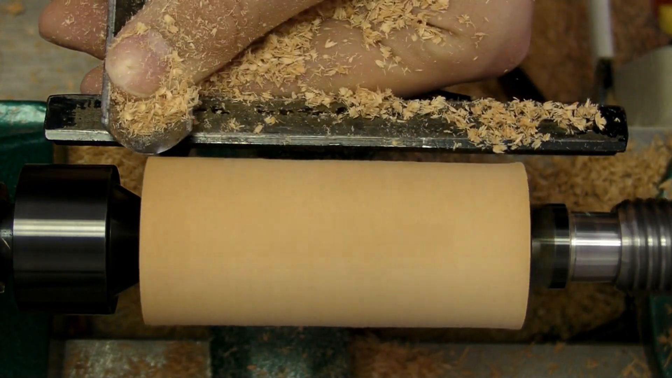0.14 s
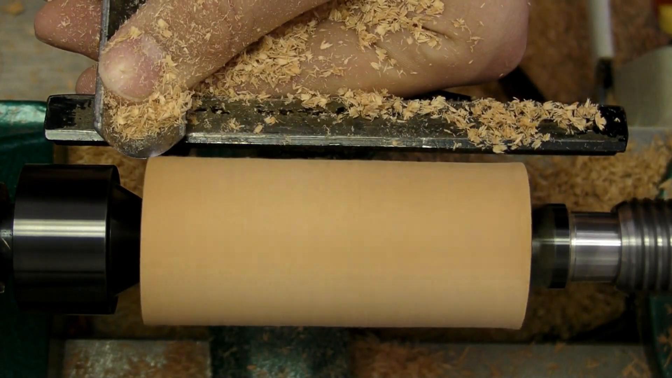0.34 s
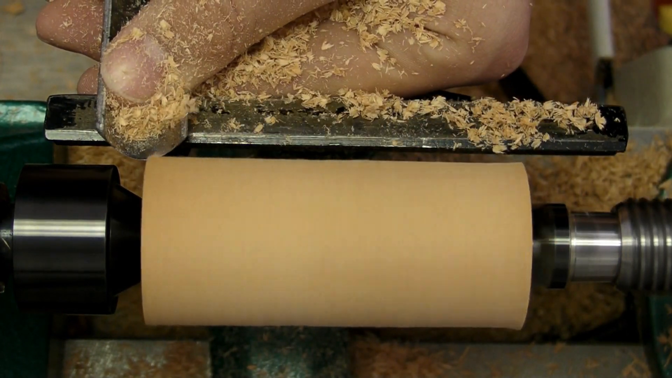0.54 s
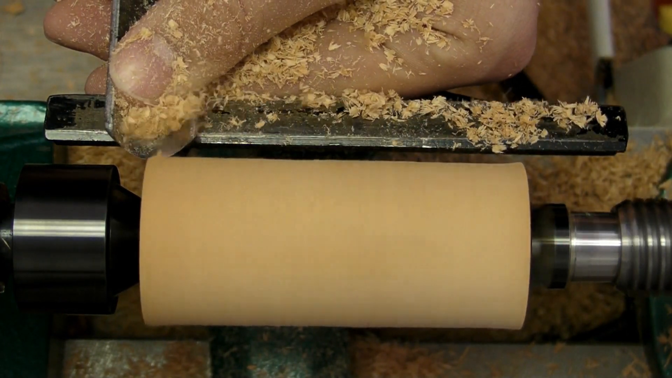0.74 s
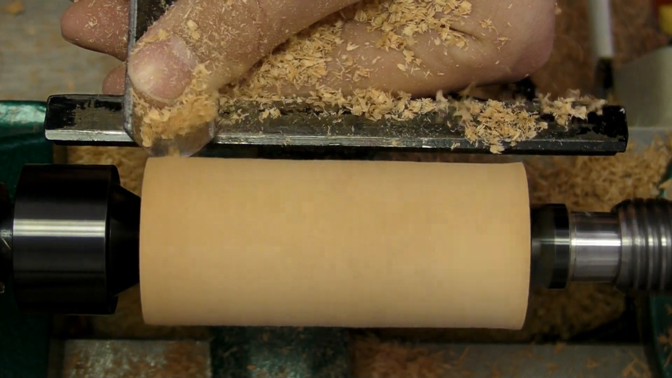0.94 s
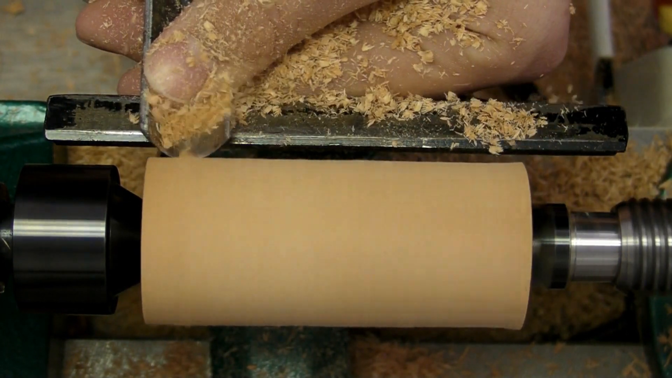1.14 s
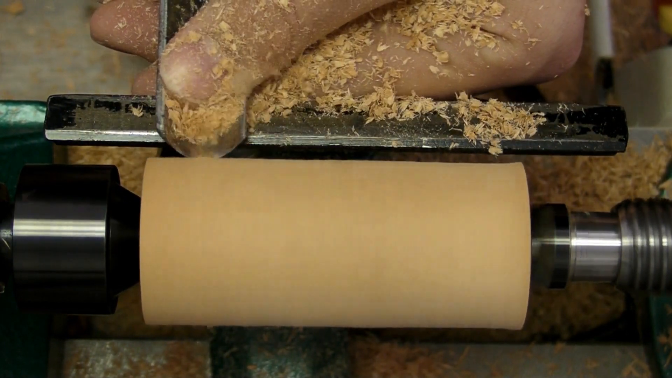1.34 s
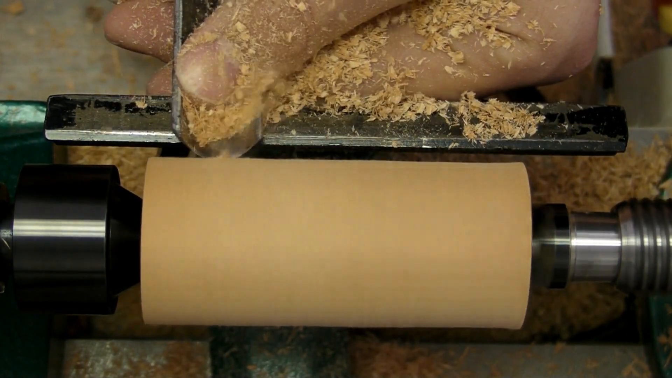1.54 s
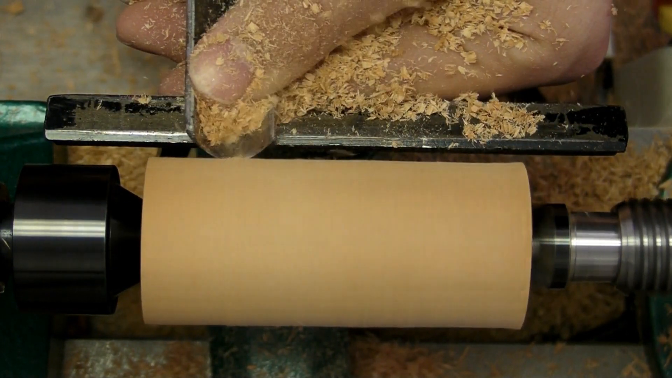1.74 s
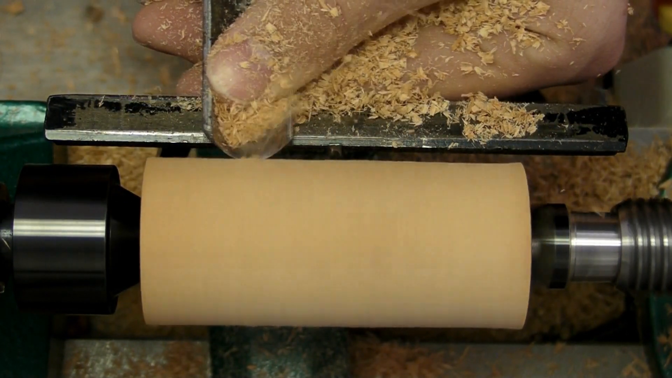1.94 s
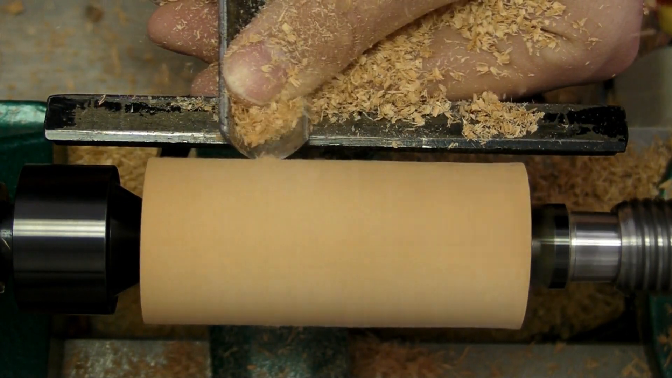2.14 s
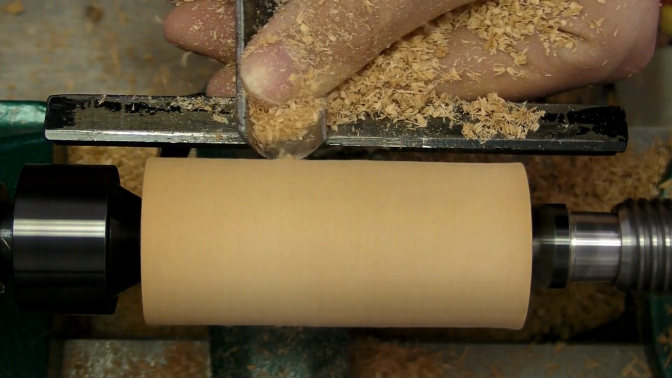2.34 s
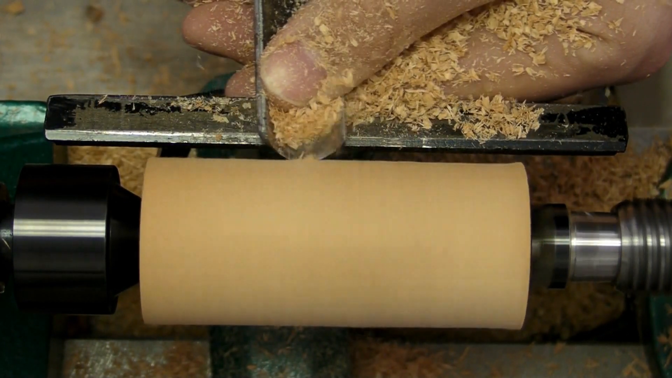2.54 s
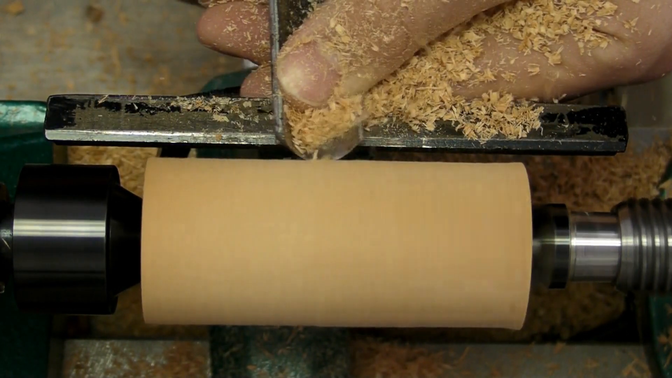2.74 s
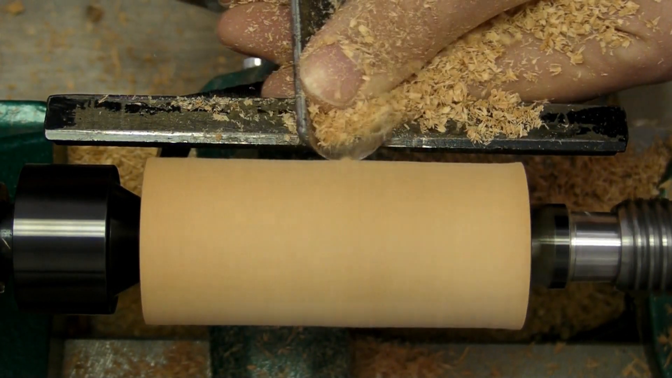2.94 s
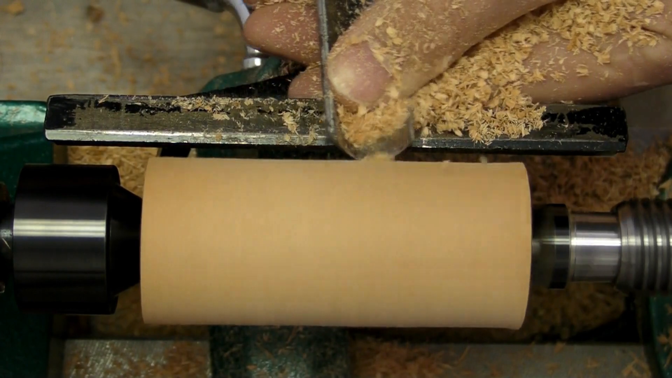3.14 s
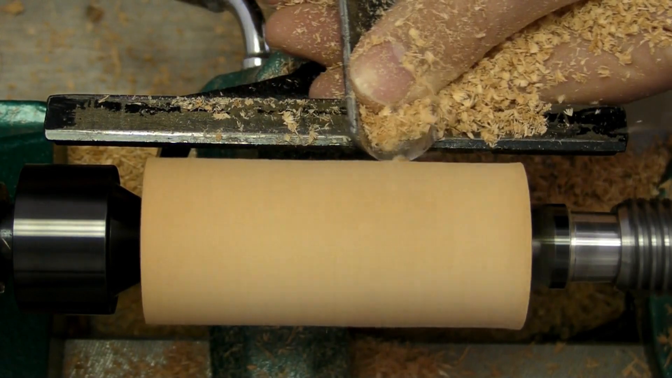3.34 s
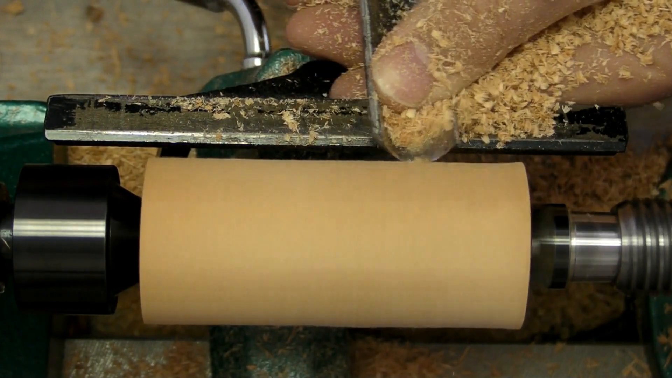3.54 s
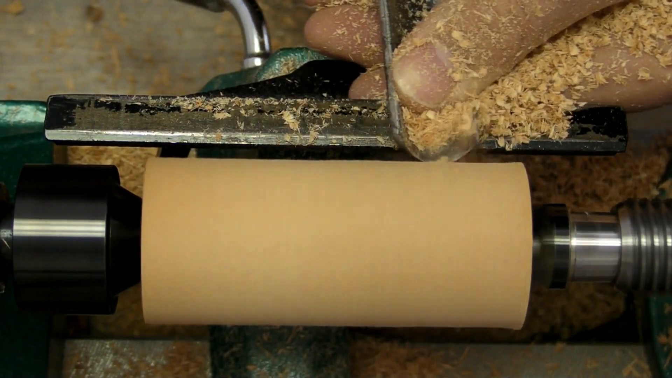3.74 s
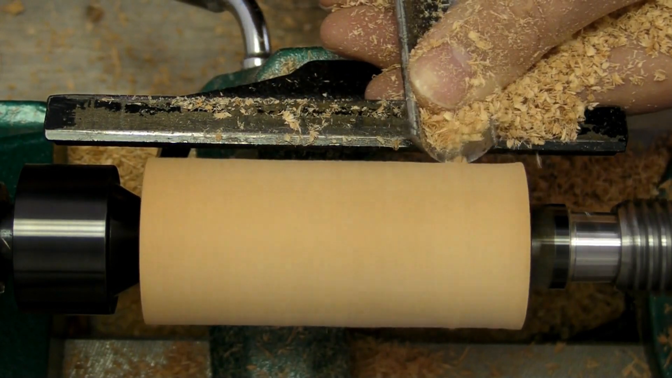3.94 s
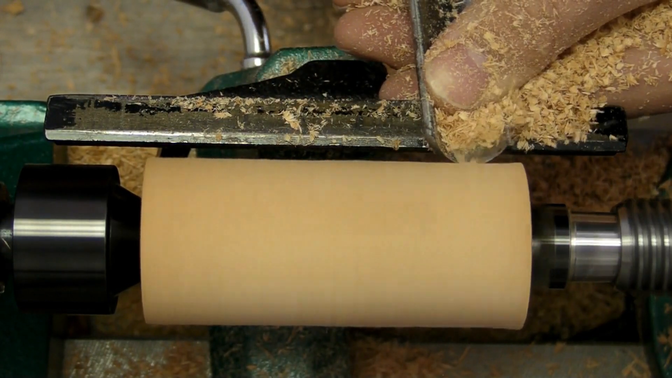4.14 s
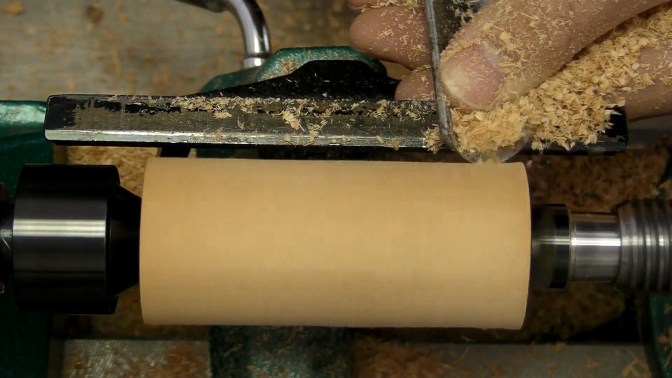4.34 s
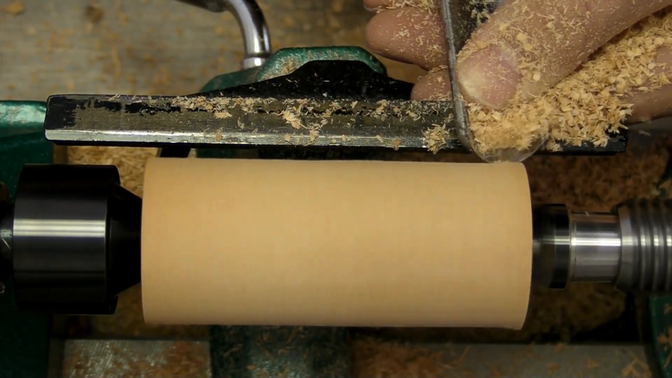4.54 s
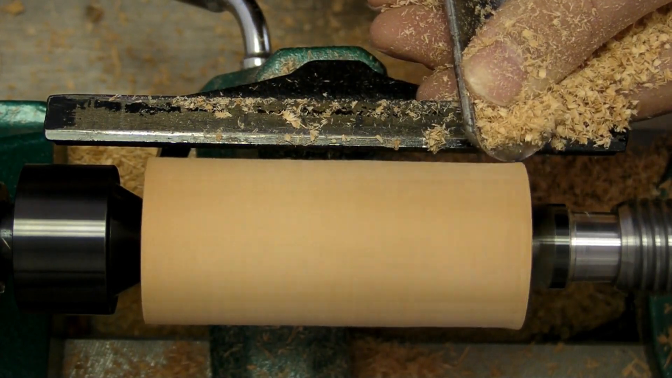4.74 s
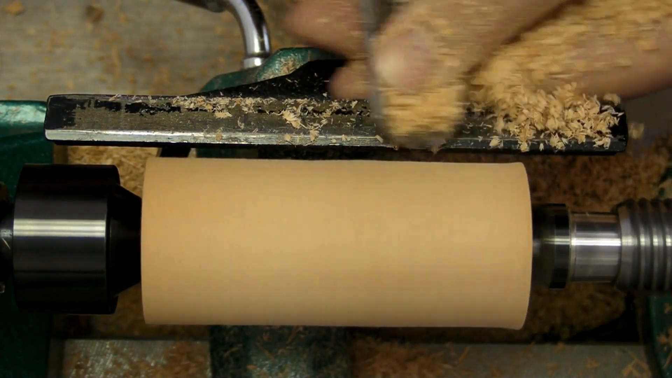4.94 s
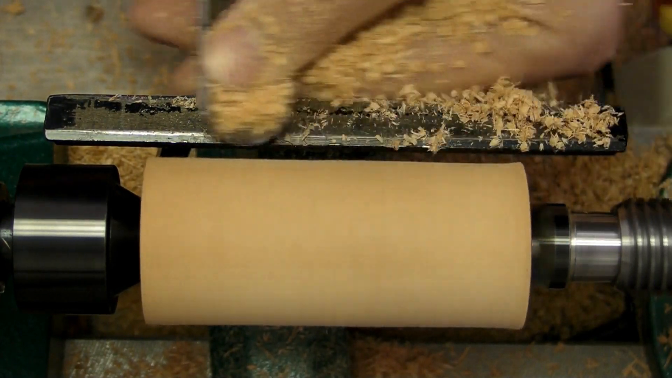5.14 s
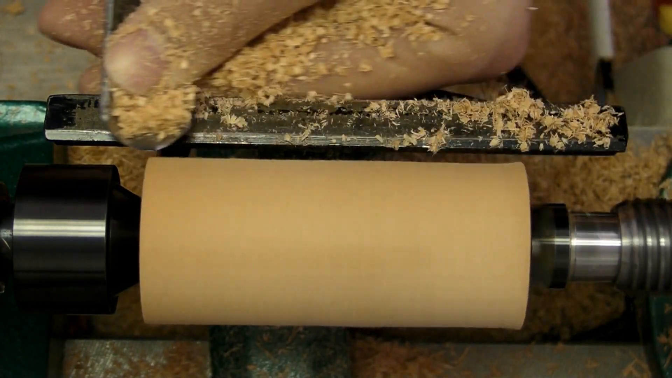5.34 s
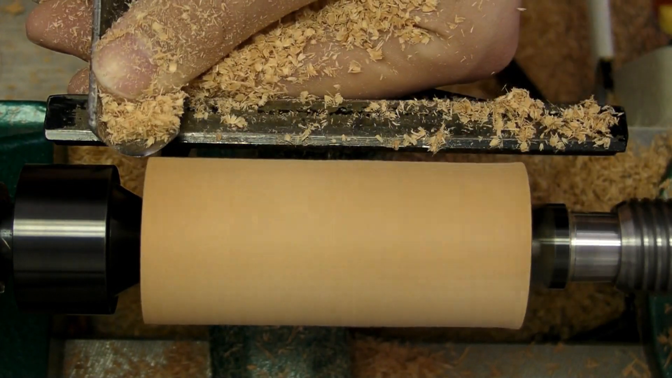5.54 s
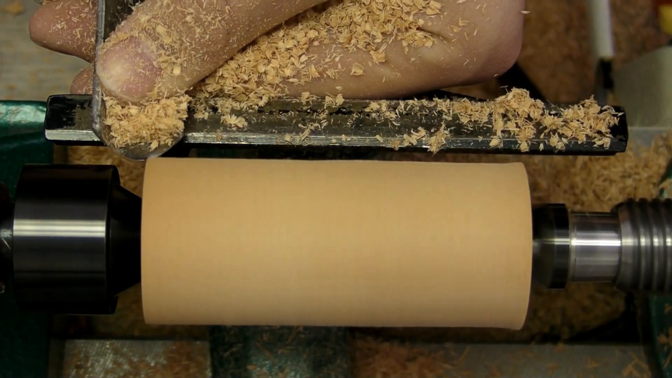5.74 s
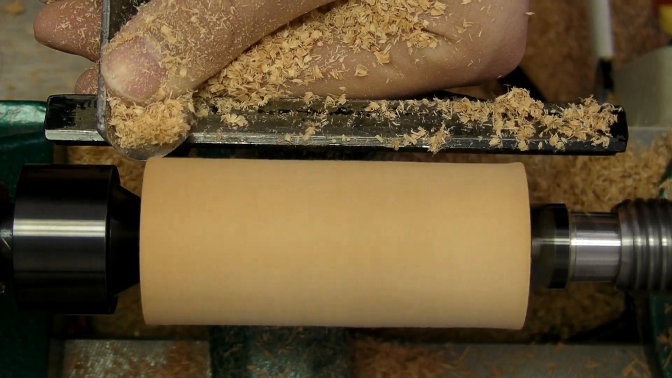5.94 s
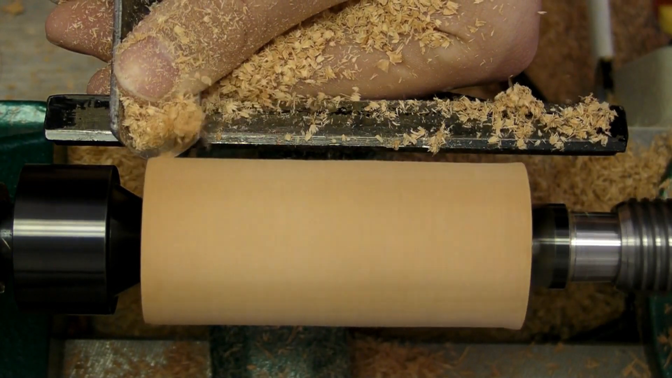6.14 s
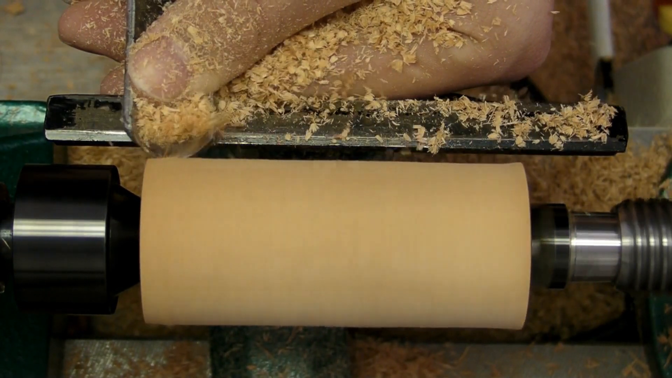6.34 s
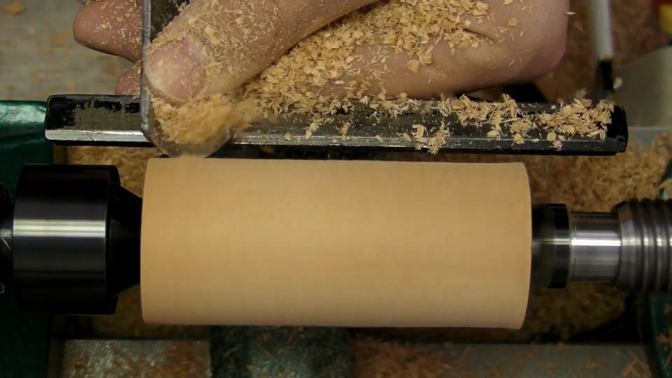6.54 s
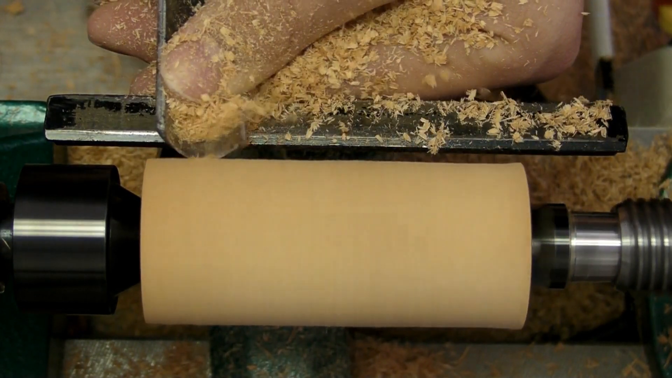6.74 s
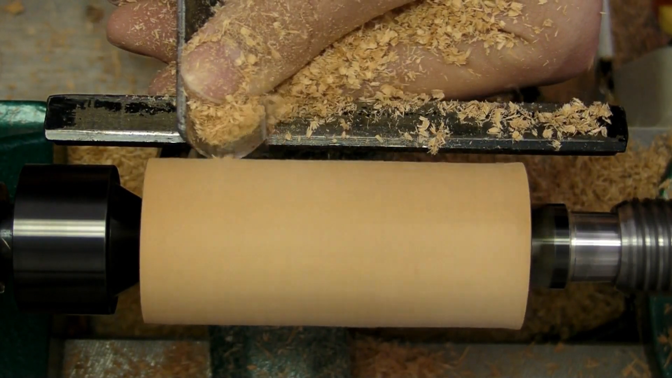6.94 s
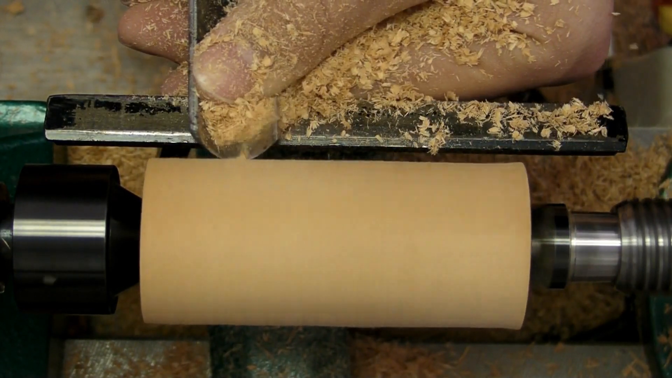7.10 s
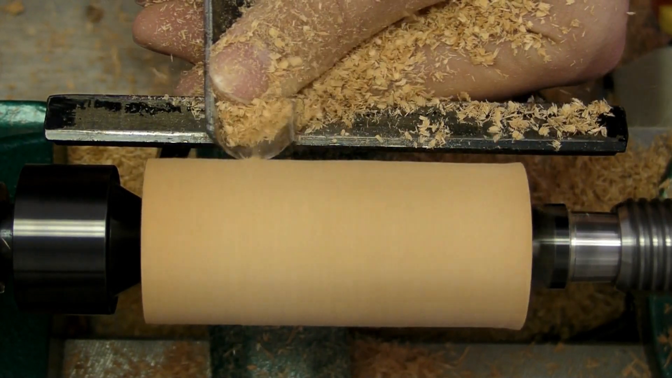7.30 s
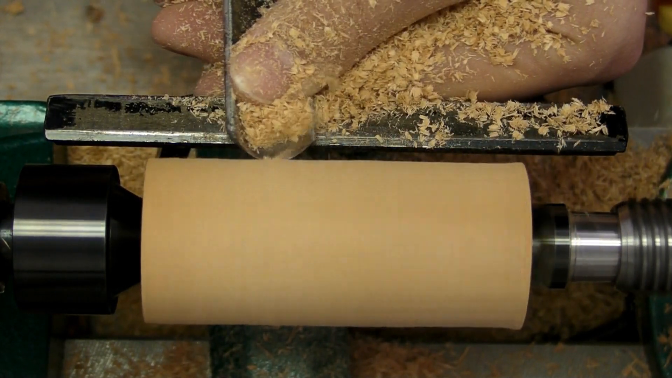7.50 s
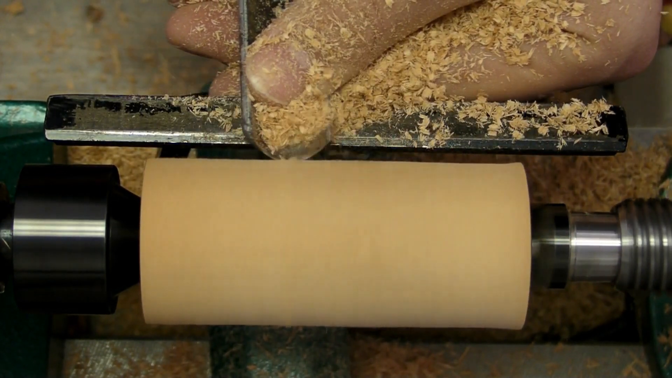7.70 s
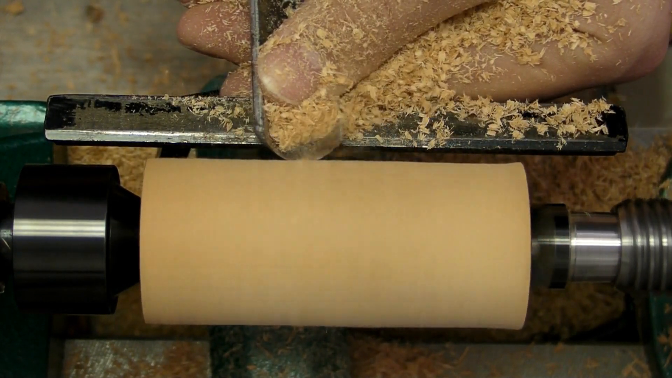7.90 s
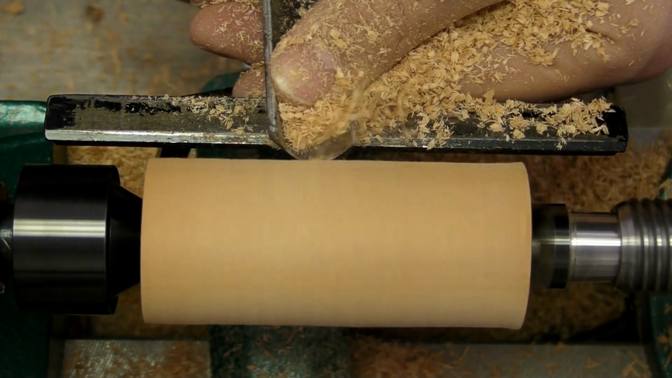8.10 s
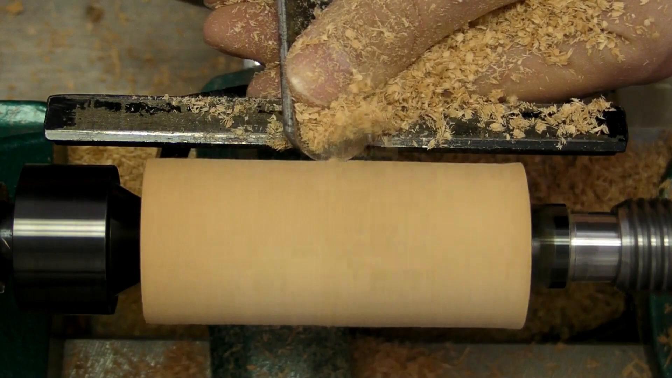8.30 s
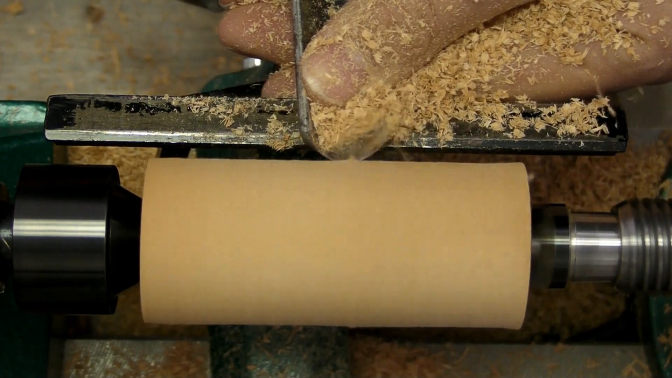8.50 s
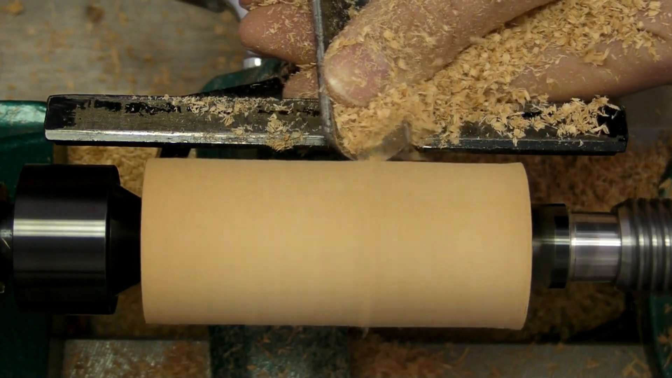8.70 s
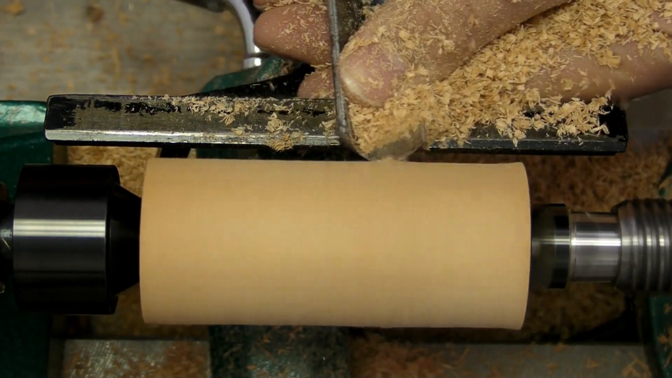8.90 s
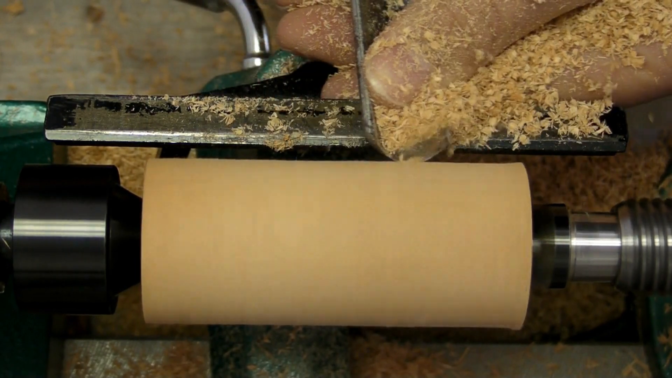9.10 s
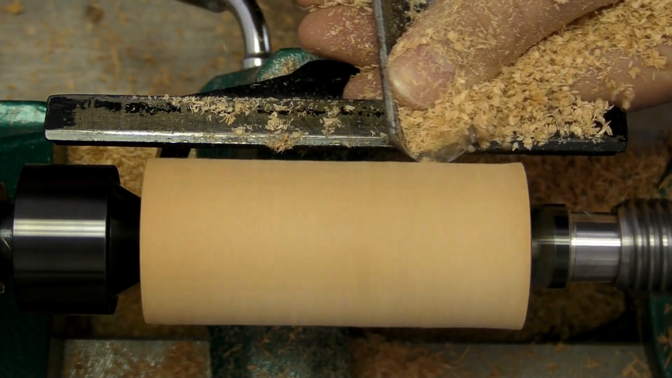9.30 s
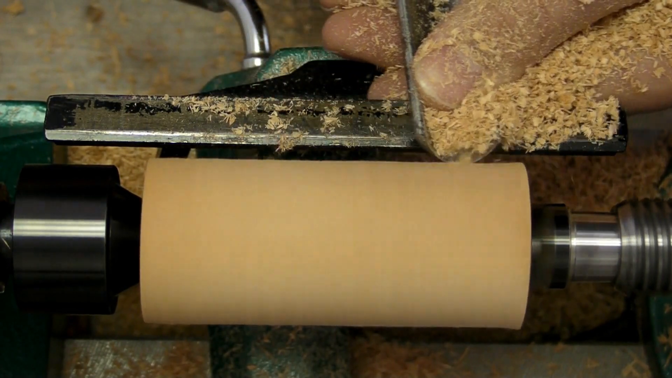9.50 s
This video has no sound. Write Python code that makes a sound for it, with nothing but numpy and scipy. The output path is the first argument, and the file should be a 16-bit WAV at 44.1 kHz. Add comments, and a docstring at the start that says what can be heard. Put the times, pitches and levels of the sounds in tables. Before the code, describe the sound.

Steady motor hum in a workshop, broken by two long fluttering, hissing wood-scraping passes with a brief steel tap on the rest between them.

```python
"""A small lathe's motor hums and washes; then a steel gouge bites a spinning wooden blank and rasps along it.
It cuts from headstock to tailstock; a second pass starts later and is still cutting at the end.
Four ridges and uneven grain shape filtered noise alike on every turn, and spindle orders add a comb of tones.
Between the passes only the motor runs, and the gouge knocks on its rest as short decaying steel tones."""
import sys
import numpy as np
from scipy import signal
from scipy.fft import rfft, irfft, next_fast_len
from scipy.io import wavfile
from scipy.ndimage import uniform_filter1d

SR = 44100
rng = np.random.default_rng(int(sys.argv[2]) if len(sys.argv) > 2 else 0)


def wrap_up_sound(samples):
    """Save the sound to the file named by the first command line argument, as 16-bit audio."""
    columns = np.atleast_2d(samples).T
    # keep every value between -1 and 1, then stretch to whole-number steps
    tamed = np.clip(columns, -1, 1)
    steps = np.round(tamed * 32767).astype(np.int16)
    wavfile.write(sys.argv[1], SR, steps)


N = 426006
TIME = np.arange(N) / SR
HZ = np.fft.rfftfreq(8192, 1 / SR)  # frequencies at which filters are drawn


def gain_of(db):
    """Turns decibels into an amplitude factor."""
    return 10 ** (np.asarray(db) / 20)


def evened(x):
    """Scales a signal to rms 1."""
    return x / np.sqrt(np.mean(x ** 2) + 1e-20)


def wave(turns):
    """Sine wave that repeats once per turn."""
    return np.sin(2 * np.pi * turns)


def read(f, value, hz=HZ):
    """Joins points with straight lines on a log-frequency axis."""
    return np.interp(np.log(hz + 1), np.log(np.add(f, 1)), value)


def bell(hz, width):
    """Bell-shaped response of one resonance, 1 at its top."""
    return 1 / (1 + (2 * (HZ - hz) / width) ** 2)


def peaked(base_db, modes):
    """A smooth spectrum with resonances standing out of it."""
    extra = sum(np.maximum(gain_of(db) ** 2 - 1, 0) * bell(f, width) ** 2 for f, width, db in modes)
    return gain_of(base_db) * np.sqrt(1 + extra)


def colour(x, gain):
    """Filters with the given gain on HZ, responding as early as possible (minimum phase)."""
    fold = irfft(np.log(np.maximum(gain, 1e-5)))
    fold[1:4096] *= 2
    fold[4097:] = 0
    response = irfft(np.exp(rfft(fold)))[:4096]
    return signal.oaconvolve(x, response)[:N]


def drift(rate_hz, stride=1):
    """Smooth random wandering up to about rate_hz, rms 1, given at every stride-th sample."""
    size = next_fast_len(N // 128 + 2) * 2
    spectrum = rfft(rng.standard_normal(size))
    slow = irfft(spectrum / (1 + (np.fft.rfftfreq(size, 64 / SR) / rate_hz) ** 4))
    return np.interp(np.arange(0, N, stride) / 64, np.arange(size), evened(slow))


def fibres(spread_db):
    """Tearing fibres: dense clicks, a few of them large."""
    size_db = spread_db * np.minimum(rng.exponential(1, N), 6)
    return evened(rng.standard_normal(N) * gain_of(size_db))


def fading_echo(t60, start):
    """Reverberation as noise dying away band by band, silent before sample start, energy 1."""
    hz, t, bands = signal.stft(rng.standard_normal(SR // 2), SR, nperseg=256)
    fading = bands * gain_of(-60 * t / t60(hz)[:, None])
    x = signal.istft(fading, SR, nperseg=256)[1]
    x[:start] = 0
    return x / np.linalg.norm(x)


# Shop reverberation: (frequency [Hz], time to fade by 60 dB [s])
SHOP_FADE = [(250, 0.66), (660, 0.65), (1740, 0.46), (4590, 0.17), (12000, 0.2)]


def shop_echo():
    """The room's echo, which lasts longest in the bass."""
    return gain_of(-7.0) * fading_echo(lambda hz: read(*np.transpose(SHOP_FADE), hz), start=300)


def near_echo():
    """Very short echo from near surfaces, fading alike at every pitch."""
    return 1.01 * fading_echo(lambda hz: 0.0093 + 0 * hz, start=0)


def scatter(x, echo, count=4):
    """Hands and gouge keep moving, so the path changes: slices of sound take turns on several echoes."""
    slot = TIME / .06  # a new slice every 0.06 s
    total = 0
    for k in range(count):
        distance = abs((slot - k + count / 2) % count - count / 2)
        share = np.maximum(np.cos(np.pi / 2 * np.minimum(distance, 1)), 0)
        total = total + signal.oaconvolve(x * share, echo())[:N]
    return total


# Idling machine's smooth wash: (frequency [Hz], relative level per Hz [dB])
WASH_SPECTRUM = [(15, -63), (25, -13), (342, -5), (460, -5.5), (707, -12), (901, -2), (1000, -17),
                 (1210, -11), (2720, -9.5), (2950, -10.5), (4080, -12.5), (9930, -19.5), (15700, -29)]
# Resonances of the machine's housing: (frequency [Hz], width [Hz], height over the wash [dB])
HOUSING_MODES = [(240, 30, 6), (400, 40, 6), (905, 41, 6), (1210, 55, 8), (1850, 30, 5), (2290, 54, 6),
                 (2460, 42, 6), (2890, 130, 9), (3680, 50, 9), (4690, 70, 4), (5140, 46, 4)]
# Steady hum tones: (frequency [Hz], relative level [dB])
HUM_LINES = [(312.2, -70), (393.0, -57), (463.0, -60.5), (619.1, -59.5), (931.3, -56), (1055, -64.5),
             (1200, -75)]
BELT_HZ = 9.45  # the whine pulses at this rate, probably once a belt lap


def motor():
    """Idling wash through the housing resonances, wavering hum lines and a pulsing whine."""
    air = rng.standard_normal(N) * gain_of(.5 * drift(30))
    wash = evened(colour(air, peaked(read(*np.transpose(WASH_SPECTRUM)), HOUSING_MODES)))
    hum = 0
    for hz, db in HUM_LINES:
        level = np.sqrt(2) * gain_of(db + 2.5 * drift(16))
        hum = hum + level * np.sin(2 * np.pi * (hz * TIME + rng.random()) + 0.44 * drift(1.8))
    pulse = np.exp(2.5 * (np.cos(2 * np.pi * BELT_HZ * (TIME - 5.61)) - 1))
    whine = gain_of(-40 + 1.5 * drift(6)) * pulse * np.sin(2 * np.pi * 928 * TIME + .5 * drift(8))
    return gain_of(-41.5) * wash, gain_of(3.5) * hum + whine


# Gouge blows on the tool rest: (time [s], strength [dB])
KNOCK_TIMES = [(5.0926, -19), (5.116, -22), (5.1232, -21), (5.133, -12.5), (5.1424, -28)]
# Steel tones of each blow: (frequency [Hz], relative level [dB], time to fade by 60 dB [s])
STEEL_TONES = [(1270, -7, .03), (1700, -7, .012), (2300, -4, .012), (2900, -4, .014), (3500, -2, .013),
               (3750, -3, .014), (4400, -6, .01)]


def knocks():
    """The gouge shank drags and taps on the rest: a scuff and short, soft steel rings."""
    t = TIME[:4000]
    blows = gain_of(-44.5) * fibres(2.9) * np.exp(-((TIME - 5.125) / 0.031) ** 2)  # the scuff
    for time, db in KNOCK_TIMES:
        blows[round(time * SR)] += gain_of(db)
    ring = sum(gain_of(db - 60 * t / t60) * np.sin(2 * np.pi * hz * t) for hz, db, t60 in STEEL_TONES)
    soft_start = 1 - np.exp(-t / 0.0007)
    return signal.oaconvolve(blows, gain_of(-4.5) * ring * soft_start)[:N]


SPIN_HZ = 17.86
# The spindle speed drifts with the load: (time [s], lag behind a steady spin [turns])
SPIN_LAG = [(0.5, -0.2), (0.75, -0.25), (1.3, -0.033), (2, 0.043), (3.2, -0.01), (4.7, -0.15), (5.9, -0.27),
            (6.1, -0.37), (6.7, -0.23), (8.2, -0.22), (9, -0.12), (9.66, -0.3)]


def spindle():
    """Turns made by the blank so far: a steady spin less the lag under load."""
    return SPIN_HZ * TIME - np.interp(TIME, *np.transpose(SPIN_LAG))


# Passes of the gouge: (bite time [s], feed [blank lengths per s], cut level [dB])
CUT_PASSES = [(0.495, .235, -16), (5.87, 0.21, -16)]
# The edge grazes, bites hard, then settles
ENTRY_DB_PER_S, GRAZE_DB, BITE_DB, SETTLE_S = 650, -6.5, 2, .02
BRUSH_EARLY_S, BRUSH_S, BRUSH_DB = .0215, .003, 10  # a ridge brushes the edge once before the bite
EXIT_DB_PER_S = 900  # the edge runs off the end of the blank
END_THROB_DB, END_SHARE = 6, 0.043  # near the end only the high side of the off-centre blank is cut
JUDDER_LATE_DB, JUDDER_BUILD_S = -30, .02  # the rest starts shaking just after the bite


def passes():
    """Place on the blank, depth of cut, judder delay and end throb: entry, steady feed, run-off."""
    starts, feeds, levels_db = np.transpose(CUT_PASSES)
    which = np.maximum(np.searchsorted(starts - .1, TIME) - 1, 0)
    since = TIME - starts[which]
    after = np.maximum(since, 0)
    along = since * feeds[which]
    graze_db = GRAZE_DB + ENTRY_DB_PER_S * since
    entry_db = np.where(since < 0, graze_db, BITE_DB * np.exp(-after / SETTLE_S))
    brush_db = BRUSH_DB * np.exp(-((since + BRUSH_EARLY_S) / BRUSH_S) ** 2)
    exit_db = -EXIT_DB_PER_S * np.maximum(since - 1 / feeds[which], 0)
    late_db = JUDDER_LATE_DB * np.exp(-after / JUDDER_BUILD_S)
    throb_db = END_THROB_DB * np.exp((np.minimum(along, 1) - 1) / END_SHARE)
    return along, levels_db[which] + entry_db + brush_db + exit_db, late_db, throb_db


# Bite around one turn, from the off-centre blank (once), its grain (twice), four ridges and their sharp backs:
# (times per turn, then pairs (relative depth [dB], crest [turns]) for
# fizz at head, fizz at tail, chatter at head, chatter at tail, blade ring)
RIM_SHAPE = [(1, (.7, .42), (2.4, .26), (1, .44), (1.8, .42), (.8, .5)), (2, (2, .057), (1.2, .06),
             (1.7, .186), (.7, .055), (2, .115)), (4, (2.9, .213), (2, .2), (1.5, .188), (1.2, .157),
             (.3, .0)), (8, (1.3, .106), (1.2, .105), (1.6, .015), (1, .005), (.3, .03))]


def rim(turns, place):
    """Uneven bite in dB around the turning blank, for fizz, chatter and blade ring."""
    angle = np.arange(256) / 256
    shape = 0
    for times, *layers in RIM_SHAPE:
        shape = shape + np.array([db * np.cos(2 * np.pi * times * (angle - crest)) for db, crest in layers])
    fizz_head, fizz_tail, chatter_head, chatter_tail, ring = shape[:, (turns * 256).astype(int) % 256]
    fizz = fizz_head + place * (fizz_tail - fizz_head)
    chatter = chatter_head + place * (chatter_tail - chatter_head)
    return fizz, chatter, ring


def surface(turns):
    """Roughness laid around the blank: each turn keeps 0.85 of the one before."""
    rows = signal.lfilter([1], [1, -.85], rng.standard_normal((180, 2048)), axis=0)
    return evened(rows.ravel()[((turns + 2) * 2048).astype(int)])


# Spindle orders: (multiple of the spin [1], relative level at head [dB], at middle [dB], at tail [dB])
SPINDLE_ORDERS = [(8, -52, -49, -53), (11, -57, -56, -48), (13, -59, -63, -48), (14, -46, -43, -42),
                  (16, -60, -51, -45), (17, -62, -53, -51), (18, -56, -55, -45), (19, -41, -40, -44),
                  (20, -38, -36, -38), (21, -44, -38, -38), (22, -33, -33, -31), (23, -37, -43, -50),
                  (24, -33, -37, -45), (25, -46, -42, -55), (26, -50, -47, -44), (27, -39, -41, -39),
                  (28, -44, -49, -49), (29, -42, -43, -47), (30, -45, -44, -38), (32, -52, -46, -37),
                  (33, -45, -53, -43), (36, -52, -49, -38), (37, -42, -41, -43), (38, -43, -42, -57),
                  (41, -58, -59, -40), (42, -57, -48, -56), (43, -52, -53, -45), (46, -58, -44, -45),
                  (47, -54, -51, -47), (48, -54, -49, -42), (50, -53, -49, -47), (53, -50, -54, -43)]


def order_comb(turns, place):
    """The surface left by the last turn returns: orders swell and slide slowly as the gouge moves on."""
    turns, place = turns[::8], place[::8]  # low orders need only every eighth sample
    comb = 0
    for order, *db in SPINDLE_ORDERS:
        level = gain_of(np.interp(place, (0, .5, 1), db) + 2 * drift(1.2, stride=8))
        phase = 2 * np.pi * (order * turns + rng.random()) + .5 * drift(1.2, stride=8)
        comb = comb + level * np.sin(phase)
    return np.sqrt(2) * signal.resample_poly(comb, 8, 1)[:N]


# Rasp between its resonances: (frequency [Hz], relative level per Hz at head [dB], at tail [dB])
RASP_SPECTRUM = [(40, -59, -30), (105, -25, -17.5), (211, -18.5, -3.5), (350, -11, -10), (770, -2.5, 6.5),
                 (1000, -10.5, 5), (2040, -4.5, 1.5), (3160, 5.5, 0), (4580, -3, 1), (6000, -3.5, -5),
                 (7200, -9.5, 1.5), (10500, -7, -2.5), (13700, -9, -12), (15700, -17.5, -9)]
# Gouge, rest and blank resonances: (frequency [Hz], width [Hz], height over the rasp at head [dB], at tail [dB])
BODY_MODES = [(1089, 22, 16, 6.7), (1196, 133, 12, 0.27), (1654, 58, 0.5, 8.4), (2214, 106, 3.5, 7.2),
              (2447, 85, 4, 10.3), (2686, 280, 7, 5.2), (3490, 450, -3, 3.7), (3832, 64, 7.5, 8.9),
              (4435, 250, 1, 5.6), (4716, 69, 9, 6.6), (4920, 98, -1, 1.5), (5656, 260, 4, 5.8),
              (9570, 1300, 9, 1.2), (10310, 240, 11, 7.4), (11500, 270, 8, 6.3), (13300, 350, -6, 8.7),
              (13700, 250, 4, 1.3333), (14660, 300, 11, 1.3333)]


def broad_rasp(bite, place, bumps, fizz_rim, hand):
    """Torn fibres through the body resonances: the ridges cut the treble sharply and the middle less."""
    f, head_db, tail_db = np.transpose(RASP_SPECTRUM)
    treble = 1 / (1 + (7900 / (HZ + 1)) ** 12)
    coarse = signal.butter(2, 1100, fs=SR, output="sos")
    torn = fibres(1.3)
    torn = torn + signal.sosfiltfilt(coarse, bumps - torn)  # coarse bumps repeat, fine tearing does not
    low_db = .8 * fizz_rim + .4 * hand + 1.2 * drift(110)
    low = bite * evened(torn * gain_of(low_db))
    high_db = 1.3 * fizz_rim + .8 * hand + 1.5 * drift(150)
    high = bite * evened(fibres(2.2) * gain_of(high_db))
    rasp = 0
    for weight, base_db, column in ((1 - place, head_db, 2), (place, tail_db, 3)):
        modes = [(mode[0], mode[1], mode[column]) for mode in BODY_MODES]
        gain = peaked(read(f, base_db), modes) / np.sqrt(len(HZ)) * gain_of(37)
        rasp = rasp + colour(weight * low, gain * np.sqrt(1 - treble))
        rasp = rasp + colour(weight * high, gain * np.sqrt(treble))
    return rasp


def resonant(bite, level_db, uneven_db, drive, modes):
    """A group of narrow resonances set ringing by its own share of the bite."""
    gain = np.sqrt(sum(gain_of(db) ** 2 * bell(f, width) ** 2 for f, width, db in modes))
    push = evened(drive * gain_of(uneven_db))
    return colour(bite * gain_of(level_db) * push, evened(gain))


# Along the blank, alike in every pass: (share of its length [1], timbre from 0 head to 1 tail [1], cut [dB],
# then, against the cut and before a fixed trim: judder [dB], blank [dB], blade ring [dB], edge chatter [dB])
ALONG_BLANK = [(0, .12, 0, -1, -8.5, -6.5, -3.5), (.15, 0.091, -1.5, -6, -9, -3.5, -1.5),
               (.35, 0.15, -0.5, -10.5, -11.5, -4, -3.5), (.55, 0.32, .5, -15.5, -22, -5.5, -5.5),
               (.64, 0.55, -.5, -9, -12, -6, -3.5), (.72, 0.9, -.5, -6.5, -11, -7.5, -3.5),
               (.8, 1, -1.5, -7.5, -6, -16.5, -2), (.93, 0.8, -1.5, -13.5, -3.5, -30, -1),
               (.985, .85, -4.5, -21, -6, -13, -1), (1, 0.9, -8.5, 0, 6, -18, -6)]
# Resonances of the rest and bed: (frequency [Hz], width [Hz], relative level [dB])
JUDDER_MODES = [(394, 20, 0), (357, 20, -6), (429, 20, -8)]
# Resonances of the wooden blank: (frequency [Hz], width [Hz], relative level [dB])
BLANK_MODES = [(520, 87, -5.5), (592, 27, 0.5), (673.4, 52, 5.5), (838, 78, 2.5), (874, 64, -4),
               (915, 59, -10)]
# Resonances of the gouge blade: (frequency [Hz], width [Hz], relative level [dB])
RING_MODES = [(2950, 105, 0), (3020, 70, -8)]
# Resonances of the chattering edge: (frequency [Hz], width [Hz], relative level [dB])
CHATTER_MODES = [(6906, 250, -19), (6830, 160, -1.5), (7010, 670, -2.5), (7300, 590, -9.5), (7697, 165, -3)]
# Judder, blank, ring and chatter come and go as the grip shifts
WANDER_DB, WANDER_HZ = (1.7, 1.9, 0.66, 1.05), 2.67


def gouge():
    """The cut: fibres torn in step with the turning blank ring the tool, the rest and the wood."""
    turns = spindle()
    along, depth_db, late_db, throb_db = passes()
    share, *columns = np.transpose(ALONG_BLANK)
    place, cut_db, *parts_db = (np.interp(along, share, column) for column in columns)
    judder_db, blank_db, ring_db, chatter_db = (
        db + wander * drift(WANDER_HZ) for db, wander in zip(parts_db, WANDER_DB))
    place = np.clip(place, 0, 1)
    judder_db = judder_db + late_db
    cut = uniform_filter1d(gain_of(depth_db + cut_db + 0.49 * drift(WANDER_HZ)), size=100)
    bite = cut * gain_of(throb_db * np.cos(2 * np.pi * (turns - .5)))
    fizz_rim, chatter_rim, ring_rim = rim(turns, place)
    hand = drift(26)  # the hand's unsteady pressure, felt by the rasp and every resonance
    bumps = surface(turns)

    rasp = broad_rasp(bite, place, bumps, fizz_rim, hand)
    slight_db = .2 * fizz_rim + .3 * hand
    rasp = rasp + resonant(bite, judder_db - 10, slight_db, bumps, JUDDER_MODES)
    rasp = rasp + resonant(bite, blank_db - 8, slight_db, bumps, BLANK_MODES)
    uneven_db = 1.6 * ring_rim + .6 * fizz_rim + .3 * hand + 1.5 * drift(70)
    rasp = rasp + resonant(bite, ring_db - 1.5, uneven_db, fibres(1.5), RING_MODES)
    uneven_db = 2.23 * chatter_rim + 0.38 * hand + 1.7 * drift(120)
    rasp = rasp + resonant(bite, chatter_db - .6, uneven_db, fibres(0.48), CHATTER_MODES)

    # the comb follows the cut, and a little of the judder
    comb = order_comb(turns, place) * cut / gain_of(-18) * gain_of(.3 * (judder_db + 10))
    return rasp, comb


# Stereo width: (frequency [Hz], gain of the side signal [dB])
SIDE_WIDTH = [(40, -4), (70, -5), (110, -12), (200, -16), (380, -18), (700, -16.5), (1290, -11),
              (2380, -14), (4400, -3), (8120, -6.5), (15000, 0)]


def scene():
    """Mid is the direct sound and its reverberation; side is scattered by near surfaces and the room."""
    wash, hum = motor()
    rasp, comb = gouge()
    noisy = rasp + wash + knocks()
    tones = comb + hum
    mid = noisy + tones + scatter(noisy, shop_echo)
    scattered = scatter(noisy + tones, lambda: near_echo() + shop_echo())
    bass_cut = HZ ** 2 / (HZ ** 2 + 45 ** 2)
    side = colour(scattered, gain_of(read(*np.transpose(SIDE_WIDTH))) * bass_cut)
    balance = gain_of([[-.25], [.05]])  # left, right
    return gain_of(-1.5) * np.array([mid + side, mid - side]) * balance


# Narrow dips in the sound: (frequency [Hz], width [Hz], level at the centre [dB])
DIPS = [(7885, 70, -20), (4950, 60, -7)]
EDGE_HZ = 15680  # top of the band


def record(dry):
    """Narrow dips and a bass roll-off, soft overload, then the band limit."""
    dips = gain_of(sum(db * bell(f, width) for f, width, db in DIPS))
    gain = dips / np.sqrt(1 + (60 / (HZ + 1)) ** 4)
    heard = np.tanh(np.array([colour(x, gain) for x in dry]) / 1.2) * 1.2
    band = signal.firwin(1023, EDGE_HZ, window=("kaiser", 10), fs=SR)
    return signal.oaconvolve(heard, band[None], "same")


dry = scene()
out = record(dry)
wrap_up_sound(out)
```